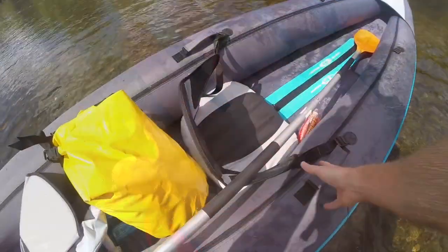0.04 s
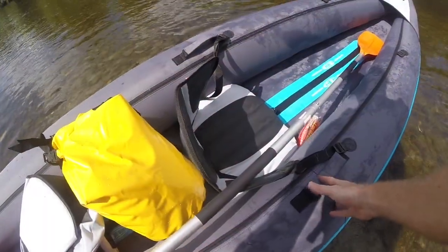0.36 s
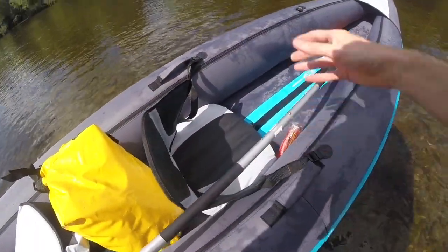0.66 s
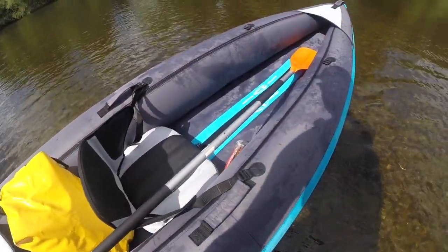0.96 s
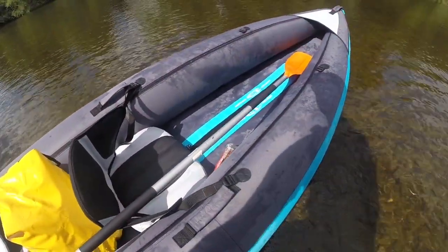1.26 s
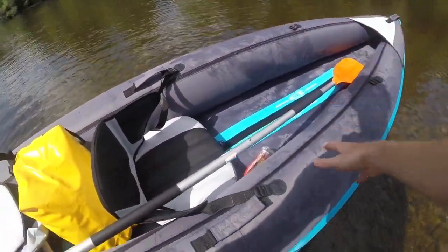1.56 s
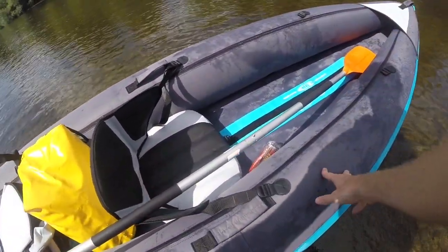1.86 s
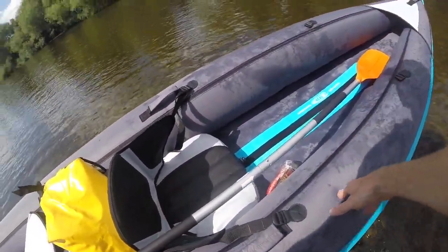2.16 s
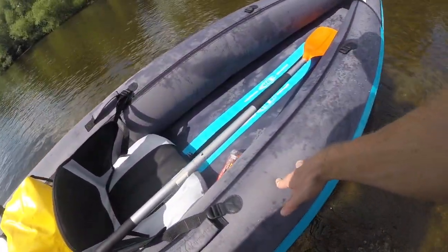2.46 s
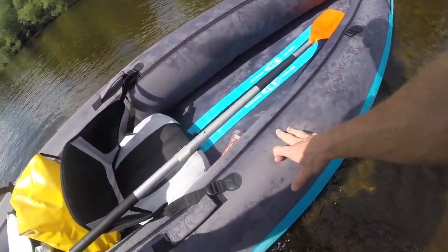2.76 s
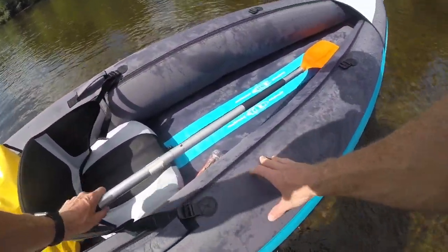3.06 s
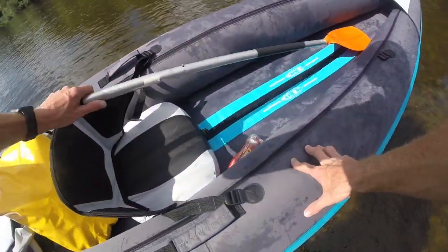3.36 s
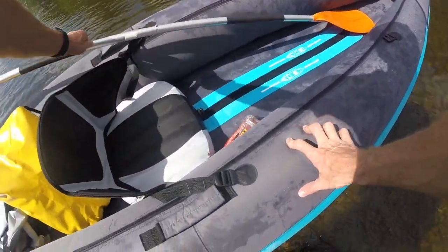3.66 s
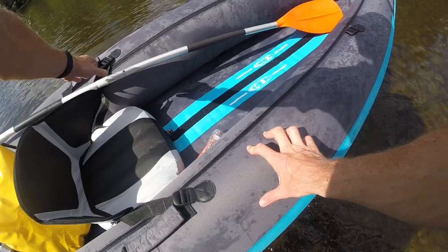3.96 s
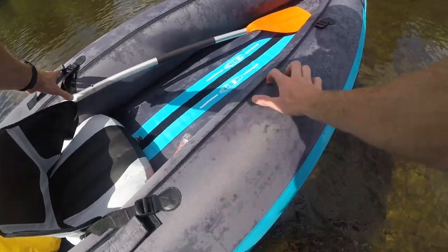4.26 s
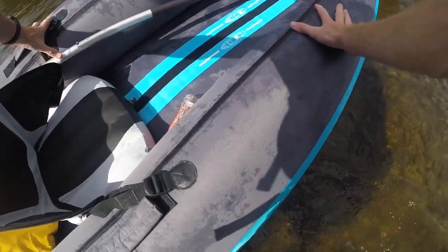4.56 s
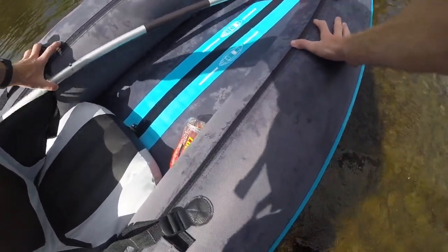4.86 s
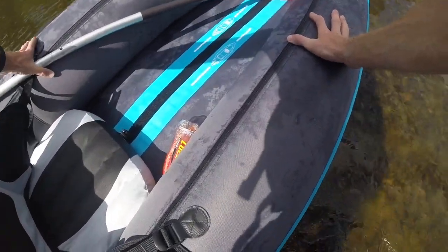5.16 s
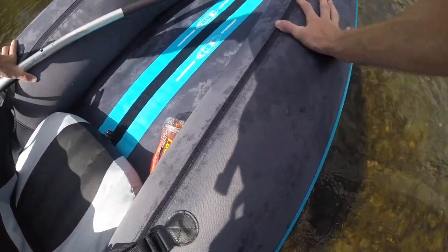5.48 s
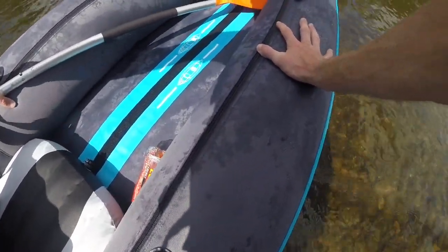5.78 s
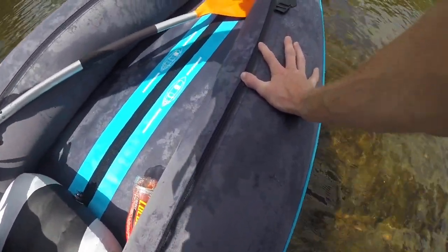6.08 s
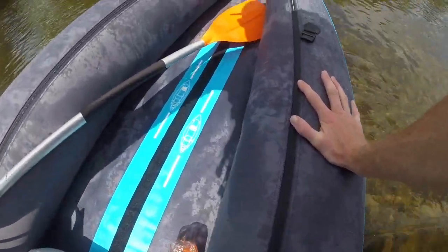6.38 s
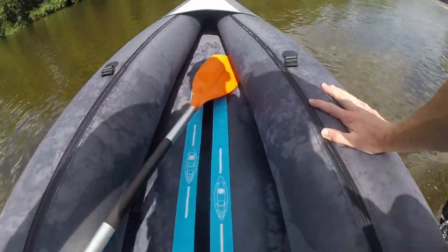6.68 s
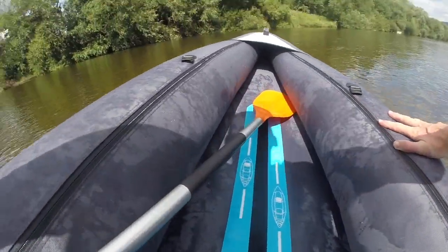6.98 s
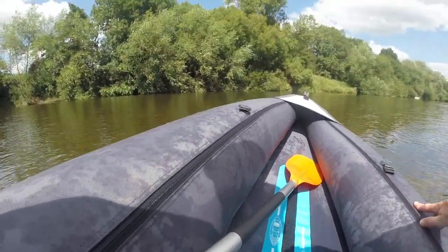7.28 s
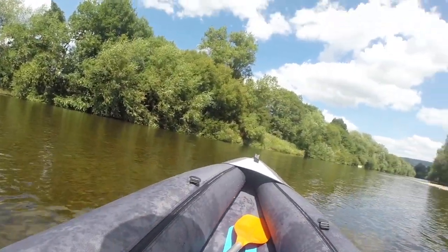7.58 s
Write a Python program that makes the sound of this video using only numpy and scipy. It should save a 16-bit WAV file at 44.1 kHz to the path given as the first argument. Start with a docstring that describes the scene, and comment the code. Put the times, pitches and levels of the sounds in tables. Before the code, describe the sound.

A hand rubs an inflatable kayak's fabric tube throughout, close up, in uneven rasping, fizzing strokes over a low hollow boom. Wind rumbles on the body-worn microphone, with a faint river wash behind. Around 0.6 seconds the palm judders briefly with two small ticks. Tiny bubbles and plops come and go, mostly before 4.5 seconds. At 1.7 seconds the microphone's plastic mount gives a loud, sharp snap with a thin ring. From 2 to 5 seconds the rubbing continues with dull bumps, short low judders and scattered light taps. Clearer taps come just after 5 seconds, then a thump at 5.7 and a click at 5.9. The rubbing peaks around 6.5 seconds as the wind strengthens. Loud snaps land at about 6.5, 6.9 and 7.1 seconds, among smaller taps, briefly dipping the other sounds. The rubbing eases by 7.6 seconds.

```python
"""Close up, a hand rubs and presses the fabric tube of an inflatable kayak in a river's shallows.
The weave rasps and fizzes, the air-filled tube booms, and bubbles and taps sound along the hull.
The one microphone is in a body-worn camera: wind buffets its port, and its plastic case colours the
rubbing and snaps sharply in its mount. The loudest snaps overload it and briefly pull its gain down."""
import sys
import numpy as np
from scipy import signal
from scipy.fft import rfft, irfft, next_fast_len
from scipy.io import wavfile
from scipy.ndimage import uniform_filter1d, map_coordinates

SR = 44100
rng = np.random.default_rng(int(sys.argv[2]) if len(sys.argv) > 2 else 0)


def wav_out(sig):
    """Save sig, one row per channel (or a flat mono array), as 16-bit PCM at SR to the path in sys.argv[1]."""
    wavfile.write(sys.argv[1], SR, np.round(np.clip(np.atleast_2d(sig).T, -1, 1) * 32767).astype(np.int16))


N = 336615
TIME = np.arange(N) / SR


def rubbing():
    """Threads of the weave flick past: coarse grains rasp, fine ones fizz, both in small clumps."""
    # spectra of the rasp and the fizz, heard through the case: f/Hz, level/dB
    rasp_colour = [(150, -20), (400, 4.5), (800, 2), (1130, 8.5), (1500, 3), (1950, 7.5), (2250, -5),
                   (2580, 8.5), (3000, -3.5), (3250, 0), (3700, -97.5), (6000, -81)]
    fizz_colour = [(1800, -24), (3300, -0.5), (3900, 2), (4600, -3), (5600, 0), (6600, -5), (7700, -9),
                   (10000, -16), (12500, -22.5), (15000, -29)]
    rasp_gain, fizz_gain = sliding()
    clumps = amp(2.5 * wander(per_s=190))
    coarse = grains(per_s=8000, spread_db=2)
    rasp = drift(colour(coarse * clumps, rasp_colour), share=0.022, per_s=14)  # as the hand moves
    fine = np.zeros(N)
    for low_hz in range(2000, 15000, 1300):  # each range of thread sizes catches in its own clumps
        band = signal.butter(3, [low_hz, low_hz + 1300], "bandpass", fs=SR, output="sos")
        catches = grains(per_s=6000, spread_db=4.5) * amp(2 * wander(per_s=120))
        fine += signal.sosfilt(band, catches)
    return rasp * rasp_gain + colour(fine * clumps, fizz_colour) * fizz_gain


def sliding(rest_rasp_db=-59, rest_fizz_db=-68.5):
    """Gains of the rasp and of the fizz: strokes rise out of the resting hand's creep."""
    # the hand slides over the fabric: middle t/s, length/s, rasp level/dB, fizz level/dB
    strokes = [(.4, 0.59, -49.5, -59.5), (.6, 0.3, -48.5, -56), (.82, 0.28, -52.5, -65.5),
               (1.22, 0.37, -56.5, -61), (1.39, 0.44, -50.5, -57.5), (1.62, 0.46, -48.5, -61),
               (2.32, 0.57, -48.5, -52), (2.68, 0.41, -51.5, -58.5), (2.9, 0.44, -49, -52),
               (3.12, 0.46, -50, -57), (3.64, 0.44, -53, -61.5), (3.8, 0.27, -49.5, -55.5),
               (4.26, 1, -55.5, -63), (4.65, 0.45, -57.5, -68), (5.1, 0.77, -48, -57),
               (5.79, 0.68, -50.5, -59), (6.11, 0.95, -50.5, -57.5), (6.56, 0.51, -43, -53.5),
               (6.82, 0.44, -49.5, -59.5), (7.1, 0.4, -51, -61), (7.56, 0.88, -57.5, -71)]
    rasp_gain = np.hypot(amp(rest_rasp_db), swells(strokes, column=2))
    fizz_gain = np.hypot(amp(rest_fizz_db), swells(strokes, column=3))
    return rasp_gain, fizz_gain


def tube(rest_db=-51.5, surge_db=3.5):
    """The hand catches and lets go in uneven surges; each slip booms in the tube."""
    # resonances of the air-filled tube: f/Hz, width/Hz, level/dB
    modes = [(82.5, 49, -3), (112.8, 51, 7.5), (147.2, 94, 2.5), (199, 44, -3), (252, 42, 3),
             (307.8, 57, -3.5), (413, 167, -17.5)]
    # the hand leans into the tube: middle t/s, length/s, level/dB
    pushes = [(.61, 0.17, -40), (.87, 0.59, -45.5), (1.09, 0.098, -42.5), (1.62, 0.77, -41.5),
              (2.32, 0.38, -39.5), (3.02, 0.52, -39), (4.04, 0.37, -41), (4.46, 0.35, -43.5),
              (5.02, 0.58, -40.5), (5.29, 0.41, -39.5), (5.86, 0.34, -40.5), (6.46, 0.61, -37),
              (6.86, 0.33, -39.5), (7.08, 0.36, -36), (7.5, 0.62, -52.5)]
    slips = grains(per_s=350, spread_db=6.5)
    boom = unit(sum(amp(db) * resonate(resonate(slips, hz, width), hz, width) for hz, width, db in modes))
    boom = drift(boom, share=0.06, per_s=8)  # as the tube flexes
    force = np.hypot(amp(rest_db), swells(pushes)) * amp(surge_db * wander(per_s=18))
    return force * even_out(boom, samples=4500)


def crackle(below_fizz_db=8, decay_s=0.0021):
    """The weave snags and lets go with bright ticks, loudest in the briskest strokes."""
    # spectrum of the ticks: f/Hz, level/dB
    tick_colour = [(1200, -31), (2500, -5), (5000, 5), (7500, -18), (12500, -3), (15000, -19)]
    _, fizz_gain = sliding()
    snags = grains(per_s=380, spread_db=5)
    t = np.arange(SR // 100) / SR
    burst = rng.standard_normal(len(t)) * np.exp(-t / decay_s)
    ticks = colour(signal.oaconvolve(snags, burst)[:N], tick_colour)
    return amp(-below_fizz_db) * fizz_gain * ticks


def hand():
    """The hand bumps the tube, judders as it sticks and slips on the taut skin, and scuffs the cloth."""
    # dull bumps: t/s, peak level/dB, f/Hz
    bumps = [(0.193, -30, 130), (0.255, -28, 110), (2.379, -27, 115), (2.545, -29, 139),
             (3.188, -29.5, 130), (3.245, -35, 109.4), (3.872, -26, 70), (3.91, -28.5, 166),
             (4.145, -30, 231), (4.271, -27.5, 95), (4.417, -27, 89.5), (4.494, -26, 125),
             (4.606, -26, 132), (4.737, -30, 71), (4.95, -26, 199), (5.232, -26, 34.4), (5.254, -30, 60),
             (5.381, -26.5, 76), (5.693, -20.5, 144), (6.457, -29.5, 92), (6.495, -23, 132),
             (6.667, -26, 70), (6.877, -28, 104)]
    # judders of the palm: t/s, length/s, level/dB, slip rate/Hz at the start, middle and end
    judders = [(1.882, 0.23, -40, 110.2, 136.8, 110), (.552, 0.091, -33, 132.2, 161, 162),
               (0.633, 0.054, -25, 96, 130, 95), (2.207, 0.041, -38.5, 132, 129, 122),
               (2.597, 0.054, -29.5, 121, 139.5, 126), (2.949, 0.1, -33, 110.4, 131.4, 158),
               (3.055, 0.065, -33.5, 134, 121, 110), (3.99, 0.096, -35.5, 149, 162.5, 149),
               (4.157, 0.029, -32, 118, 135, 136), (4.466, 0.068, -34.5, 154.5, 128.6, 112),
               (6.83, 0.063, -35.5, 135, 154, 146)]
    # quick scuffs: t/s, length/s, level/dB, centre f/Hz
    scuffs = [(0.079, 0.039, -45.5, 2150), (0.083, 0.037, -53.5, 5800), (0.414, 0.017, -44, 4080),
              (3.807, 0.0075, -42.5, 3180), (6.178, 0.013, -49, 4100), (7.343, 0.057, -58.5, 6000)]
    out, t = np.zeros(N), np.arange(SR // 6) / SR
    for s, db, hz in bumps:
        age = t * hz / 0.26  # swells within half a cycle and dies in two or three
        add(out, s, amp(db) * age * np.exp(1 - age) * np.sin(2 * np.pi * hz * t))
    for s, length, db, *rates in judders:
        progress = np.arange(0, length, 1 / SR) / length
        jitter = 1 + 0.04 * wander(per_s=139)[:len(progress)]
        turns = np.cumsum(np.interp(progress, [0, 0.5, 1], rates) * jitter) / SR
        slips = sum(np.sin(2 * np.pi * k * turns) / k ** 2.2 for k in range(1, 4))  # rounded sawtooth
        add(out, s, amp(db) * slips * np.sin(np.pi * progress) ** 0.28)
    for s, length, db, hz in scuffs:
        threads = grains(per_s=2700, spread_db=5.5)[:round(length * SR)]
        scuff = resonate(threads, hz, width=0.14 * hz) * signal.windows.tukey(len(threads), 0.5)
        add(out, s, amp(db) * unit(scuff))
    return out


def snaps(rise_s=0.00077, take_up_s=0.002, crack_db=-28, crack_s=0.00037, panel_hz=2400):
    """Right at the microphone, the mount snaps against the case; far panels and a metal part ring on."""
    # snaps: t/s, level/dB, extra body/dB, extra treble/dB, extra bite/dB, pitch factor, after-ring/dB
    strikes = [(1.7007, 5.5, -19, 2.5, 3, 0.99, -0.5), (5.9347, -10.5, 16, -4, -16, 1, -8.5),
               (6.4267, -16, 17, 2, 2, 1, -10), (6.4958, -1.5, 15.5, 12.5, 19, 0.88, -5),
               (6.9141, 3.5, -27.5, 3, 4.5, 0.996, 0.2), (7.0932, 4, -24, 2, -0.5, 1, -1.5)]
    # modes of the four parts that ring: f/Hz, level/dB, t60/s
    case = [(1166, -6.5, 0.022), (1550, -9, 0.026), (1834, 21, 0.0091), (2235, -9.5, .028),
            (2580, -1, 0.0075), (3192, -6.5, 0.018), (3864, -3, 0.0091), (5340, -18.5, 0.016),
            (6390, -12, 0.0099), (9500, -18.5, 0.0066)]  # where the snap strikes
    panels = [(1170, -10, 0.021), (1860, -2, 0.041), (2230, -11, 0.037), (2680, -19.5, 0.03),
              (3255, -14, 0.016), (3824, -25.5, .02), (5200, -32, 0.029), (5730, -21, .011),
              (6280, -32.5, .012), (7070, -30, 0.024)]  # the far panels, which take up the blow and ring against it
    metal = [(1868, -30, 0.23), (2845, -51, 0.2)]  # a small part with a thin, long ring
    mount = [(282, -20, 0.036), (510, -23, 0.013)]  # gives with a dull knock
    out, t = np.zeros(N), np.arange(SR // 4) / SR
    hz = np.transpose(case)[0]
    shell = signal.butter(2, 800, "highpass", fs=SR, output="sos")  # a small shell radiates little bass
    crack_lowpass = signal.butter(2, 9000, fs=SR)
    knock = ringing(mount, t)
    after_ring = ringing(metal, t) - ringing(panels, t) * (1 - np.exp(-t / take_up_s))
    for s, db, body_db, treble_db, bite_db, pitch, after_db in strikes:
        # the point of impact weights the case's modes, and shifts only those below panel_hz
        tilt_db = np.select([hz < 1600, hz < panel_hz, hz < 5800, hz < 8000],
                            [body_db, 0, treble_db, bite_db])
        struck = ringing(case, t, tilt_db, pitch=np.where(hz < panel_hz, pitch, 1))
        blow = signal.sosfilt(shell, struck * (1 - np.exp(-t / rise_s)))
        crack = signal.lfilter(*crack_lowpass, rng.standard_normal(len(t)) * np.exp(-t / crack_s))
        snap = blow / abs(blow).max() + amp(crack_db) * crack + knock + amp(after_db) * after_ring
        add(out, s, amp(db) * snap)
    return out


def taps(stray_count=16, rise_s=0.000067, tick_s=0.0001, focus_db=6, skirt_db=-14):
    """Fingers, paddle and water tap the hull: each a tick and a brief scrunch around its own pitch."""
    # taps: t/s, peak level/dB, centre f/Hz, decay/s
    contacts = [(0.551, -28, 2660, 0.0028), (0.594, -25.5, 1880, 0.002), (1.56, -30.5, 1060, 0.011),
                (2.352, -33, 1170, 0.0097), (3.354, -44, 1900, 0.0029), (3.65, -31.5, 1850, 0.0025),
                (3.796, -29, 1920, 0.0039), (3.963, -32, 1090, 0.007), (3.982, -42, 1500, 0.0024),
                (4.429, -38, 1450, .003), (4.635, -35, 1810, 0.0027), (4.671, -26, 1860, 0.0049),
                (4.753, -40, 1290, 0.0078), (4.823, -32, 980, 0.0076), (4.836, -36, 1100, 0.0036),
                (5.026, -31.5, 900, 0.013), (5.109, -20, 1290, 0.0036), (5.191, -21.5, 1910, 0.003),
                (5.205, -33.5, 2580, 0.012), (5.31, -27.5, 990, 0.007), (5.37, -36, 1160, 0.013),
                (5.43, -34, 860, 0.0098), (5.603, -35, 1060, 0.017), (5.668, -34, 1120, 0.011),
                (5.881, -27.5, 1090, 0.0035), (6.127, -30.5, 1130, 0.0046), (6.342, -31.5, 1200, 0.0057),
                (6.827, -32, 1720, 0.0083), (6.945, -19.5, 1300, 0.0035), (6.999, -23, 1250, 0.0045),
                (7.076, -28, 1590, 0.0047), (7.11, -21, 1580, 0.0049), (7.575, -35, 940, 0.0067)]
    # the spectrum they share: f/Hz, level/dB
    tap_colour = [(150, -18.5), (400, 14), (750, 2), (1130, 8), (1950, 4), (2300, 2), (3300, -1.5),
                  (6600, -6), (9000, -20.5)]
    # fainter taps fall at random
    strays = [(rng.random() * N / SR, -45.5 - 3 * abs(size), 1140 * 2 ** (0.29 * pitch), 0.013)
              for size, pitch in rng.standard_normal((stray_count, 2))]
    out, t = np.zeros(N), np.arange(SR // 25) / SR
    hz = np.fft.rfftfreq(len(t), 1 / SR) + 1
    fabric_db = spectrum_db(hz, tap_colour)
    for s, db, centre_hz, decay_s in contacts + strays:
        attack = 1 - np.exp(-t / rise_s)
        decay = np.exp(-(t / decay_s) ** 0.99) + 0.41 * np.exp(-t / tick_s)
        emphasis_db = np.maximum(-focus_db * np.log2(hz / centre_hz) ** 2, skirt_db)
        phases = np.exp(2j * np.pi * rng.random(len(hz)))
        tap = attack * decay * irfft(amp(fabric_db + emphasis_db) * phases, len(t))
        add(out, s, amp(db) * tap / abs(tap).max())
    return out


def wind(lumpy_db=4):
    """Lumpy pressure on the microphone port: gusts on top of a breeze."""
    # spectrum of the eddies: f/Hz, level/dB
    wind_colour = [(8, -8), (22, 4.5), (38, -5), (60, -4.5), (90, -10.5), (150, -17), (400, -33.5),
                   (2000, -83.5)]
    # the breeze freshens as the camera swings out over the river: t/s, level/dB
    breeze = [(0, -48), (3.5, -45.5), (4.4, -43), (7.1, -38), (7.63, -41.5)]
    # gusts buffet the camera: middle t/s, length/s, level/dB
    gusts = [(.07, 0.05, -37), (.25, 0.088, -38), (.58, 0.27, -38), (.75, 0.42, -41), (1.09, 0.16, -40),
             (1.62, 0.36, -33.5), (2.26, 0.25, -38.5), (2.78, .15, -41), (3.88, 0.58, -35.5),
             (6.65, 0.79, -34.5), (7.08, 0.54, -32)]
    eddies = even_out(colour(rng.standard_normal(N), wind_colour), samples=5000)
    breeze_db = np.interp(TIME, *np.transpose(breeze)) + lumpy_db * wander(per_s=26)
    return np.hypot(amp(breeze_db), swells(gusts)) * eddies


def trickle(single_count=520, gurgle_per_s=65, gurgle_octaves=0.4, gurgle_spread_db=4):
    """Tiny bubbles burst as the moving hull stirs the water, singly and in gurgling runs."""
    # runs of bubbles along the hull: t/s, length/s, level/dB, centre f/Hz
    gurgles = [(0.319, 0.091, -49, 1710), (1.329, 0.12, -37.5, 3400), (2.227, 0.21, -40.5, 2260),
               (2.807, 0.31, -42.5, 1505), (3.573, 0.18, -42.5, 1360), (3.877, .32, -47.5, 4150),
               (4.237, 0.13, -45.5, 1440)]
    out = np.zeros(N)
    rasp_gain, fizz_gain = sliding()
    low_gain, high_gain = amp(-10) * rasp_gain, amp(-7) * fizz_gain  # single bubbles follow the strokes
    for when, pitch, size in rng.random((single_count, 3)):
        hz = 900 * 7.5 ** np.sqrt(pitch)
        stir = (high_gain if hz > 3300 else low_gain)[int(when * N)]
        add(out, when * N / SR, (3 + 13 * size ** 4) * stir * bubble(hz))
    for s, length, db, centre_hz in gurgles:
        for when, pitch, size in rng.random((40, 3))[:round(length * gurgle_per_s)]:
            hz = centre_hz * 2 ** (gurgle_octaves * (2 * pitch - 1))
            add(out, s + when * length, amp(db + gurgle_spread_db * (2 * size - 1.5)) * bubble(hz))
    return out


def bubble(hz, cycles=7, rise=0.015):
    """One bubble: it rings for some cycles while its pitch climbs."""
    t = np.arange(SR // 30) / SR
    age = t * hz / cycles
    return np.minimum(6 * age, 1) * np.exp(-age) * np.sin(2 * np.pi * hz * t * (1 + rise * age))


def river(wash_db=-61.5):
    """A faint wash of river behind everything, and nearby plops whose pitch climbs as they surface."""
    # spectrum of the wash: f/Hz, level/dB
    wash_colour = [(40, 24), (300, 4), (1000, -24), (2700, -82), (5000, -44.5), (9000, -9), (15000, -14.5)]
    # bubbles beside the hull: t/s, length/s, peak level/dB, starting f/Hz, rise/octaves
    plops = [(0.342, 0.0036, -32.5, 1180, .1), (0.355, 0.0072, -39.5, 920, 0.13),
             (1.024, 0.0063, -44, 1160, .2), (1.213, 0.013, -33, 1040, 0.39),
             (1.356, 0.0045, -44, 4440, .1), (2.309, 0.0078, -37, 3900, .05),
             (2.86, 0.0052, -38.5, 3000, .1), (3.105, 0.0027, -41, 5200, 0.11),
             (3.959, 0.007, -40, 1070, 0.11), (4.284, 0.036, -43, 1435, 0.071),
             (4.313, 0.017, -40.5, 1574, 0.08), (4.384, 0.009, -41.5, 1260, 0.44),
             (5.516, 0.008, -46, 1620, 0.37)]
    out = amp(wash_db) * colour(rng.standard_normal(N), wash_colour)
    for s, length, db, hz, rise in plops:
        age = np.arange(0, length, 1 / SR) / length
        envelope = np.minimum(age / 0.038, 1) * (1 - age ** 2)
        turns = np.cumsum(hz * 2 ** (rise * age)) / SR
        add(out, s, amp(db) * envelope * np.sin(2 * np.pi * turns))
    return out


def amp(db):
    """Decibels to gain."""
    return 10 ** (np.asarray(db) / 20)


def unit(x):
    """Scales to rms 1."""
    return x / np.sqrt(np.mean(x ** 2) + 1e-20)


def even_out(x, samples):
    """Holds the running rms near 1."""
    return x / np.sqrt(uniform_filter1d(x ** 2, size=samples) + 1e-6)


def add(mix, s, sound):
    """Mixes a sound in at time s."""
    part = mix[max(round(s * SR), 0):][:len(sound)]
    part += sound[:len(part)]


def spectrum_db(hz, points):
    """Level at hz of a spectrum drawn on a log-frequency axis."""
    point_hz, point_db = np.transpose(points)
    return np.interp(np.log(hz), np.log(point_hz), point_db)


def colour(x, points):
    """Filters by a drawn spectrum; rms 1."""
    size = next_fast_len(N)
    hz = np.fft.rfftfreq(size, 1 / SR) + 1
    return unit(irfft(rfft(x, size) * amp(spectrum_db(hz, points)), size)[:N])


def resonate(x, hz, width):
    """A band-pass resonance of gain 1."""
    return signal.lfilter(*signal.iirpeak(hz, hz / width, SR), x)


def ringing(modes, t, tilt_db=0, pitch=1):
    """The modes of a struck part: a sum of dying sines."""
    hz, db, t60 = np.transpose(modes)
    envelopes = amp(db + tilt_db - 60 * t[:, None] / t60)
    return (envelopes * np.sin(2 * np.pi * hz * pitch * t[:, None])).sum(1)


def wander(per_s):
    """A random curve of rms 1 that turns per_s times a second."""
    knots = np.arange(0, N / SR + 1, 1 / per_s)
    return unit(np.interp(TIME, knots, rng.standard_normal(N)[:len(knots)]))


def grains(per_s, spread_db):
    """Random clicks, mostly small and a few large."""
    size = amp(spread_db * np.minimum(rng.exponential(1, N), 4))
    return unit(size * rng.choice([-1, 1], N) * (rng.random(N) < per_s / SR))


def swells(rows, column=2, roundness=2.11, top=0.49):
    """Gain of overlapping arches, each reaching its column's level at the share top of its length."""
    power = np.zeros(N)
    for row in rows:
        middle, length = row[:2]
        phase = np.interp((TIME - middle) / length + 0.5, [0, top, 1], [0, 0.5, 1])
        power += amp(row[column]) ** 2 * abs(np.sin(np.pi * phase)) ** (2 * roundness)
    return np.sqrt(power)


def drift(x, share, per_s):
    """Lets every resonance of a steady sound slide up and down together by a share of its pitch."""
    place = np.cumsum(1 + share * wander(per_s))
    return map_coordinates(x, [place % (N - 1)], order=3, mode="mirror")


def scene():
    """Everything as it reaches the one body-worn microphone."""
    return (wind() + tube() + rubbing() + crackle() + hand() + river() + trickle() + taps() + snaps())[None]


def record(dry, threshold_db=-16, recovery_db_per_s=32, sense_s=0.0022, attack_s=0.0037, edge_hz=15500):
    """The camera's gain falls fast at a loud snap and creeps back; then overload and the band limit."""
    keep, lag = np.exp(-1 / (sense_s * SR)), np.exp(-1 / (attack_s * SR))
    power_db = 10 * np.log10(signal.lfilter([1 - keep], [1, -keep], dry[0] ** 2) + 1e-12)
    recovery_db = recovery_db_per_s * TIME
    held_db = np.maximum.accumulate(power_db + recovery_db) - recovery_db
    over_db = np.maximum(held_db - threshold_db, 0)
    ducked = dry * amp(-signal.lfilter([1 - lag], [1, -lag], over_db))
    overloaded = ducked / (1 + ducked ** 6) ** (1 / 6)
    band_limit = signal.firwin(255, edge_hz, window=("kaiser", 8), fs=SR)
    return signal.oaconvolve(overloaded, band_limit[None], "same")


dry = scene()
out = record(dry)
wav_out(out)
```